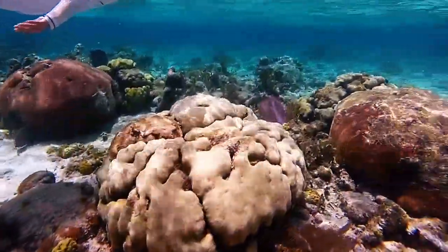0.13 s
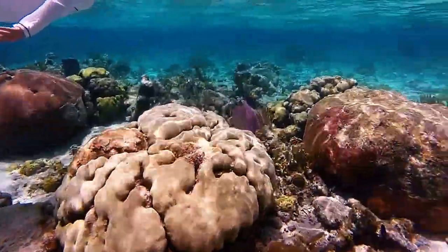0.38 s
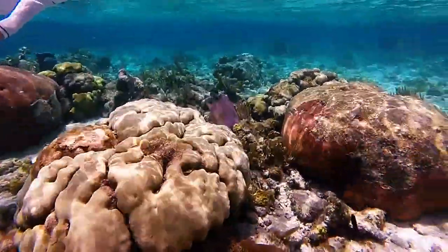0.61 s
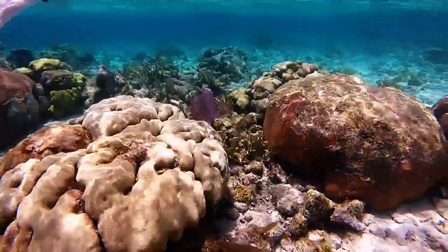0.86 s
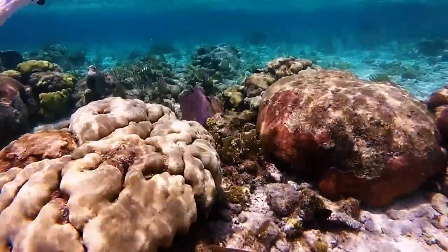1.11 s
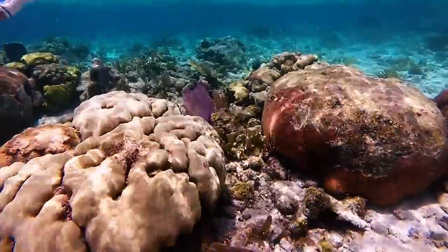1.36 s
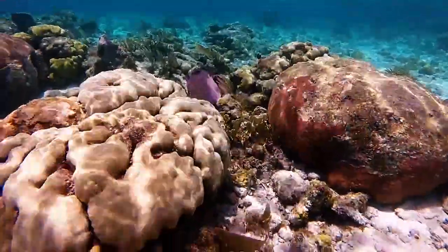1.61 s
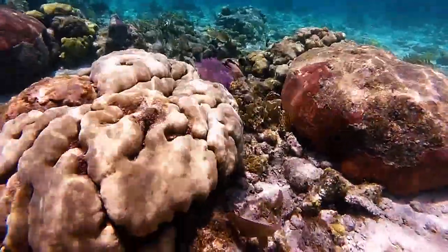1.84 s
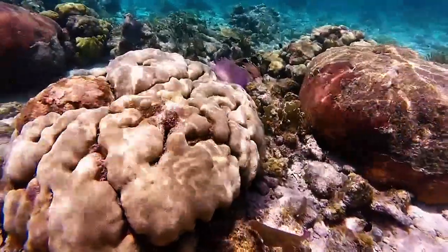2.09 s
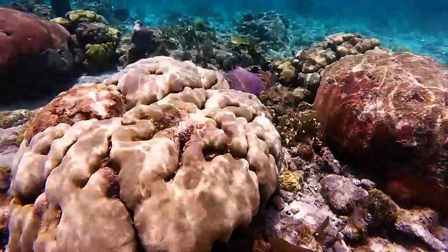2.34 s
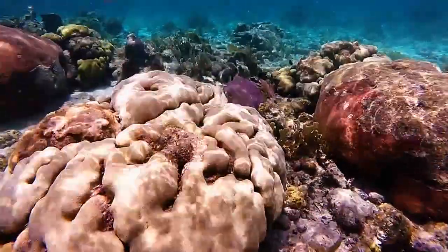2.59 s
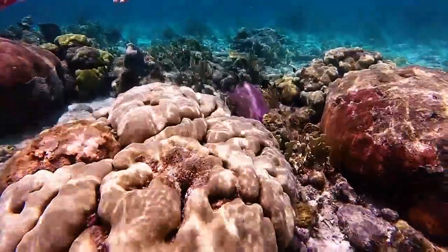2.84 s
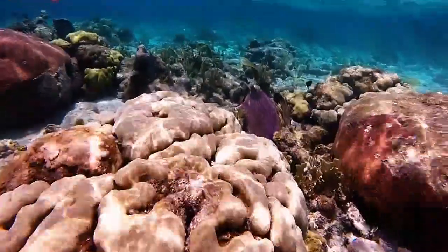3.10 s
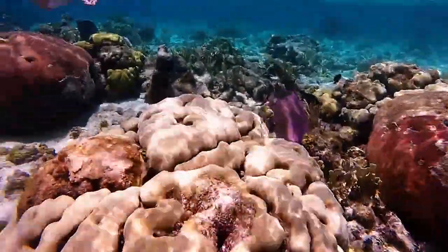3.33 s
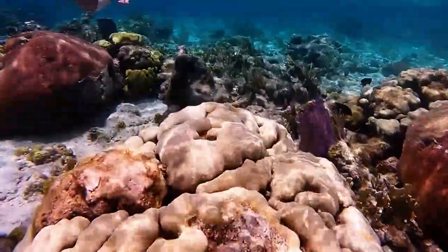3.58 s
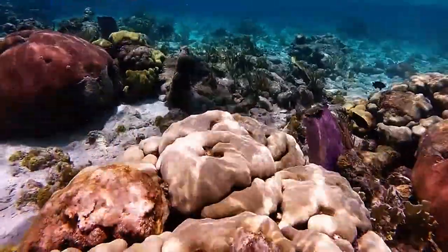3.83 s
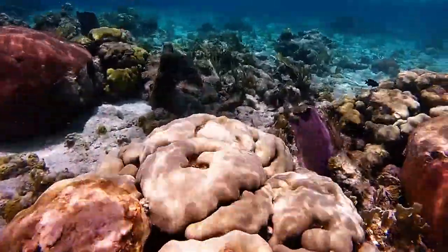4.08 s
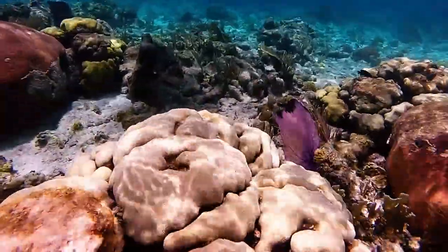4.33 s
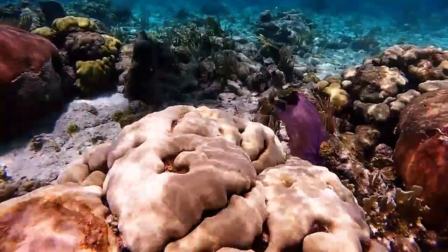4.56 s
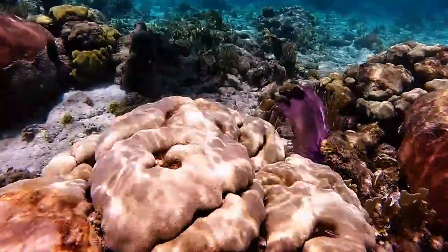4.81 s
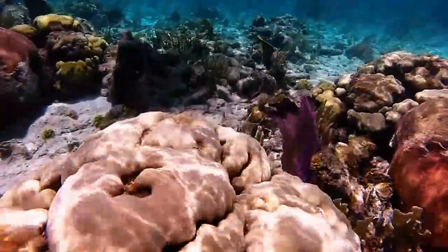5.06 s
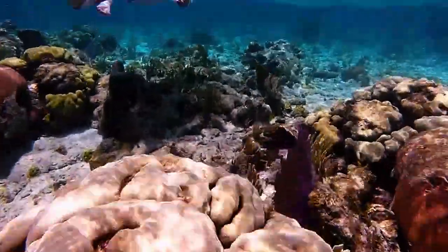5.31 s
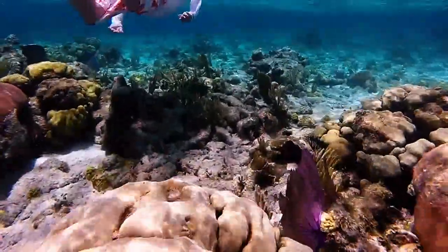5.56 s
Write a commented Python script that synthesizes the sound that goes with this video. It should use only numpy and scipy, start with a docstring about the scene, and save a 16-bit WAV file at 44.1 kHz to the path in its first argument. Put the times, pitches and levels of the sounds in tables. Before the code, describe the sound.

A mono, close and muffled underwater sound from inside a plastic camera housing gliding over a shallow reef. Low swell rumble, blurred gurgling and a soft even hiss lie beneath wavering bubble fizz and very faint, distant shrimp crackle. From the start, nearer shrimp make tiny treble snaps, bubbles break off in short bright puffs, and large ones glug with soft, slightly rising tones. Small bubbles soon plip like brief ringing drops. At 1.3 seconds a sharp, bright knock cracks against the housing; a duller clack follows at 1.8. A strong plip and puff pop at 2.35, another near 3.0. The heaviest knock lands at 3.3, with a deep thud and short ring, pushing everything down briefly before it recovers. Softer bumps come around 3.7, then a cluster of light taps at 4.4 to 4.55. Glugs gather between 3.8 and 4.9; a clear plip at 5.2 precedes thinning fizz until 5.7.

```python
"""Under water inside a plastic housing: a low rumble, gurgle and hiss lie under steady fizz and far shrimp crackle.
From the start near shrimp snap in the treble, bubbles break off in bright puffs and large ones glug as gliding tones;
soon small ones plip as brief ringing sines. From 1.3 s hard knocks set the housing's modes ringing, the heaviest
at 3.3 s. A limiter ducks the whole mix around any peak over its ceiling and lets it climb back."""
import sys
import numpy as np
from scipy import signal
from scipy.fft import rfft, irfft, next_fast_len
from scipy.io import wavfile
from scipy.ndimage import uniform_filter1d, minimum_filter1d, map_coordinates

SR = 44100
rng = np.random.default_rng(int(sys.argv[2]) if len(sys.argv) > 2 else 0)


def makeup_ratio(level_db):
    """Linear amplitude ratio for a level in decibels (20 dB per factor of ten)."""
    decades = np.asarray(level_db, float) / 20
    return 10 ** decades


def log_audio(samples):
    """Write samples as a 16-bit WAV file to the path given in sys.argv[1]."""
    # one column per channel
    frames = np.atleast_2d(samples).T
    # limit to full scale, then quantise
    limited = np.clip(frames, -1, 1)
    pcm = np.round(limited * 32767).astype(np.int16)
    wavfile.write(sys.argv[1], SR, pcm)


N = 250488  # length in samples


def unit(x):
    """Scales a sound to rms 1."""
    return x / np.sqrt(np.mean(x ** 2) + 1e-20)


def curve(rows, column):
    """One column of a time table, joined by straight lines, one value per sample."""
    table = np.transpose(rows)
    return np.interp(np.arange(N) / SR, table[0], table[column])


def coloured(x, points):
    """Equalizes x through (Hz, dB) points joined on a log frequency axis."""
    size = next_fast_len(len(x) + 8192)  # spare room keeps the end from wrapping onto the start
    hz, db = np.transpose(points)
    bin_hz = np.fft.rfftfreq(size, 1 / SR)
    gain = makeup_ratio(np.interp(np.log(bin_hz + 1), np.log(hz), db))
    return irfft(rfft(x, size) * gain, size)[:len(x)]


def wobble(rate):
    """A smooth random curve with rate knots a second."""
    knots = rng.standard_normal(int(N * rate / SR) + 4)
    return map_coordinates(knots, [np.arange(N) * rate / SR])


def place(start_s, shapes):
    """Sums the rows of shapes, each from its own start time."""
    start = np.round(np.asarray(start_s) * SR).astype(int)
    at = start[:, None] + np.arange(shapes.shape[1])
    return np.bincount(at.ravel(), shapes.ravel(), N + SR)[:N]


def peaked(db, shapes):
    """Scales each row so that its peak is db."""
    return makeup_ratio(db)[:, None] * shapes / np.abs(shapes).max(axis=1, keepdims=True)


def bubbles(db, hz, t60, attack, rise, size):
    """Damped sines, one a row, whose pitch climbs by the share 2 * rise in each t60."""
    t = np.arange(size) / SR
    db, hz, t60, attack = (np.reshape(v, (-1, 1)) for v in (db, hz, t60, attack))
    phase = 2 * np.pi * hz * t * (1 + rise * t / t60)
    swell = (1 - np.exp(-t / attack)) ** 2
    return makeup_ratio(db - 60 * t / t60) * swell * np.sin(phase)


def swarm(count, low_hz, high_hz, cycles, spread_db, attack, size):
    """Bubbles of random pitch, life and level at random moments, rms 1."""
    draw = rng.random((count, 4))
    hz = low_hz * (high_hz / low_hz) ** draw[:, 1]
    level_db = -spread_db * np.log(draw[:, 2] + .03)
    life = cycles * (0.49 + draw[:, 3]) / hz
    shapes = bubbles(level_db, hz, life, attack, rise=0.093, size=size)
    return unit(place(draw[:, 0] * N / SR, shapes))


def bursts(count, t60, attack, size, tail_db=-24.0):
    """Short dying puffs of noise, each with a weak longer tail scattered back by reef and surface."""
    t = np.arange(size) / SR
    decay = makeup_ratio(-60 * t / t60) + makeup_ratio(tail_db - 60 * t / 0.045)
    swell = 1 - np.exp(-t / attack)
    fade = np.linspace(1, 0, size)
    return rng.standard_normal((count, size)) * decay * swell * fade


def banded(noise, hz, skirt_db, floor_db, top_db):
    """Colours each row: a peak at its hz, skirt_db one octave off, a floor changing by top_db per octave above."""
    octaves = np.log2((np.fft.rfftfreq(noise.shape[1], 1 / SR) + 1) / hz[:, None])
    peak_db = skirt_db * octaves ** 2
    shelf_db = floor_db + top_db * np.maximum(octaves, 0)
    return irfft(rfft(noise) * makeup_ratio(np.maximum(peak_db, shelf_db)))


# Levels of the low water. Each row: time in seconds, rumble rms in dB, gurgle rms in dB.
WATER_LEVELS = [(0, -47, -51.5), (.45, -49.5, -51.5), (1, -53.5, -58.5), (1.4, -47, -53.5),
                (2.04, -54.5, -57.5), (2.34, -46.5, -52.5), (2.74, -54.5, -52.5), (3.1, -48, -54),
                (4, -51, -52), (4.65, -47.5, -48), (5.2, -49.5, -61), (5.68, -46, -59.5)]
# Colour of the swell's rumble. Each row: frequency in Hz, gain in dB.
RUMBLE_COLOUR = [(15, -6), (30, 4), (48, 0), (65, -5), (100, -3.5), (130, -53), (200, -54.5)]
# Colour of the far gurgle. Each row: frequency in Hz, gain in dB.
GURGLE_COLOUR = [(80, -54), (120, -15.5), (160, -2.5), (230, -1.5), (290, -5), (350, -8.5), (500, -47)]
# Colour of the sea and microphone hiss. Each row: frequency in Hz, gain in dB.
HISS_COLOUR = [(59, -29), (100, -2.5), (277, -14), (381, -10), (558, -12), (705, -13), (1390, -19),
               (2800, -21), (5650, -30), (11400, -39.5), (16000, -65.5)]


def water():
    """Swell rumbles against the housing, far large bubbles gurgle, sea and microphone hiss evenly."""
    rumble = unit(coloured(rng.standard_normal(N), RUMBLE_COLOUR) * makeup_ratio(1.6 * wobble(7.1)))
    far = swarm(count=260, low_hz=115, high_hz=313.0, cycles=12, spread_db=-1.5, attack=0.0021, size=7000)
    # noise blurs the single bubbles together
    gurgle = unit(coloured(far + makeup_ratio(17.5) * rng.standard_normal(N), GURGLE_COLOUR))
    hiss = unit(coloured(rng.standard_normal(N), HISS_COLOUR))
    low = makeup_ratio(curve(WATER_LEVELS, column=1)) * rumble + makeup_ratio(curve(WATER_LEVELS, column=2)) * gurgle
    return low + makeup_ratio(-55) * hiss


# Level of the fizz. Each row: time in seconds, level in dB.
FIZZ_LEVELS = [(0, -51), (1, -52.5), (1.3, -49.5), (1.37, -51), (1.6, -53.5), (1.9, -61.5), (2.3, -48.5),
               (2.8, -54.5), (3.05, -50), (3.35, -58), (3.9, -50), (4.6, -49.5), (5.05, -56.5), (5.68, -60)]
# How the housing wall passes the fizz. Each row: frequency in Hz, gain in dB.
WALL_COLOUR = [(500, -25), (800, -11.5), (890, -5), (1030, -13), (1250, -1), (1480, 1), (1790, 3.5),
               (1930, -9), (2200, -8.5), (2450, -1), (2700, -7.5), (2900, -9), (3300, -13), (3650, -23),
               (6000, -25), (15000, -39)]


def fizz(count=500):
    """Tiny bubbles ring and tick over a wavering noise bed of far ones, all heard through the wall."""
    near = swarm(count=2500, low_hz=824, high_hz=4320, cycles=22.2, spread_db=4.0, attack=0.00032, size=1200)
    near = near * makeup_ratio(1.3 * wobble(13.0))  # loose clumps
    bed = rng.standard_normal(N) * makeup_ratio(3.5 * wobble(30))
    draw = rng.random((count, 2))
    tick_gain = makeup_ratio(-3.6 * np.log(draw[:, 1:] + 0.018))  # many soft, few loud
    ticks = tick_gain * bursts(count=count, t60=0.028, attack=0.00098, size=700)
    ticks = coloured(place(draw[:, 0] * N / SR, ticks), [(800, 0.5), (1800, -10.0), (3500, 6), (6000, 5.0)])
    mix = unit(coloured(near, WALL_COLOUR)) + 0.57 * unit(coloured(bed, WALL_COLOUR))
    mix = mix + 0.48 * unit(coloured(ticks, WALL_COLOUR))
    return makeup_ratio(curve(FIZZ_LEVELS, column=1)) * unit(mix)


def crackle(count=420):
    """Far shrimp: many faint noise snaps at random moments."""
    draw = rng.random((count, 2))
    snap_gain = makeup_ratio(-4 * np.log(draw[:, 1:] + .01))
    faint = snap_gain * bursts(count=count, t60=.012, attack=.0003, size=700)
    colour = [(1500, -19), (4000, -12.0), (8000, -18.0), (11000, -16), (15000, -17.5)]
    return makeup_ratio(-72.5) * unit(coloured(place(draw[:, 0] * N / SR, faint), colour))


# Near shrimp. Each row: start in seconds, peak in dB, brightest frequency in Hz.
SNAP_EVENTS = [(0.018, -43, 6400), (0.0552, -38.5, 5100), (0.0698, -39.5, 4500), (0.292, -43, 6100),
               (0.7745, -41.5, 8060), (1.4158, -31.5, 4850), (1.7843, -35.5, 11000), (1.813, -33, 4860),
               (1.934, -32, 7950), (2.0949, -42.5, 6100), (2.2405, -36.5, 4630), (2.3508, -31.5, 5560),
               (2.391, -38.5, 5670), (2.48, -43.5, 4500), (2.5244, -31, 4960), (3.0211, -30.5, 4560),
               (3.3672, -39, 4690), (3.8512, -38, 5350), (3.9759, -39.5, 5970), (4.0193, -43, 7600),
               (4.216, -43, 7060), (4.4118, -27.5, 8500), (4.732, -39.5, 6800), (4.9795, -32.5, 6500),
               (5.02, -31.5, 4270), (5.1724, -34.5, 6260), (5.45, -42.5, 7440)]


def snaps():
    """A collapsing cavity: a puff of treble noise, brightest in a broad band of its own."""
    s, db, hz = np.transpose(SNAP_EVENTS)
    noise = bursts(count=len(s), t60=0.012, attack=0.00015, size=1024)
    return place(s, peaked(db, banded(noise, hz, skirt_db=-18, floor_db=-11, top_db=-2)))


# Bubbles breaking off. Each row: start in seconds, peak in dB, brightest frequency in Hz.
PUFF_EVENTS = [(0.018, -43, 2780), (0.458, -33, 2780), (0.551, -41.5, 2600), (0.565, -41, 3120),
               (0.634, -40.5, 2840), (0.707, -40.5, 3020), (1.111, -40.5, 3440), (1.283, -30.5, 2820),
               (1.415, -24, 1460), (2.24, -42, 2440), (2.35, -23, 2800), (2.486, -35, 2650),
               (2.524, -34, 2920), (2.931, -39, 2500), (2.953, -39, 2850), (3.02, -28, 2520),
               (3.077, -36, 2360), (4.171, -43, 2630), (4.413, -30, 2850), (4.776, -43.5, 2080),
               (4.977, -38.5, 2450), (5.02, -30.5, 2290), (5.166, -46, 2330), (5.173, -26, 2840),
               (5.327, -37.5, 2510)]


def puffs():
    """A bubble breaking off gives a short bright puff of noise in a narrow band."""
    s, db, hz = np.transpose(PUFF_EVENTS)
    noise = bursts(count=len(s), t60=0.017, attack=0.0018, size=1024)
    return place(s, peaked(db, banded(noise, hz, skirt_db=-90, floor_db=-25.5, top_db=-4.5)))


# Large bubbles. Each row: start in seconds, peak in dB, starting pitch in Hz, t60 in seconds.
GLUG_EVENTS = [(0.037, -42, 110, .1), (0.155, -43.5, 239, .086), (0.213, -40.5, 223, 0.26),
               (0.287, -41.5, 150, 0.18), (0.403, -40.5, 215, 0.24), (0.514, -31, 161, 0.13),
               (0.878, -38.5, 183, 0.27), (1.279, -27.5, 161, 0.14), (1.312, -32.5, 160, 0.1),
               (1.695, -39, 163, 0.09), (1.736, -46, 166, 0.15), (2.099, -28.5, 194, 0.071),
               (2.468, -42.5, 190, 0.21), (2.896, -40, 157, .078), (3.488, -31.5, 248, 0.097),
               (3.835, -40.5, 196, .17), (3.894, -34.5, 171, 0.12), (3.974, -38.5, 189, .15),
               (4.057, -37.5, 247, 0.071), (4.108, -42, 238, .09), (4.139, -40.5, 266, 0.056),
               (4.354, -38.5, 180.5, 0.11), (4.573, -36, 260, 0.082), (4.627, -29.5, 177, 0.027),
               (4.687, -34, 211, 0.13), (4.808, -33.5, 227, 0.052), (4.865, -35, 259.4, 0.13)]


def glugs():
    """Large bubbles start softly and rise a little in pitch as they ring out."""
    s, db, hz, t60 = np.transpose(GLUG_EVENTS)
    return place(s, peaked(db, bubbles(0, hz, t60, attack=0.0033, rise=.07, size=9000)))


# Small bubbles that ring. Each row: start in seconds, peak in dB, starting pitch in Hz.
PLIP_EVENTS = [(0.177, -40, 1510), (0.242, -35, 1280), (0.335, -41, 1490), (0.413, -40, 1410),
               (0.458, -34.5, 2990), (0.499, -37, 1640), (0.566, -42, 1540), (0.634, -41, 885),
               (0.775, -44, 833), (1.018, -42, 1800), (1.112, -32.5, 1430), (1.283, -26.5, 2910),
               (1.443, -36.5, 1760), (1.957, -38.5, 1346), (2.24, -29.5, 1390), (2.35, -17.5, 1590),
               (2.376, -37.5, 904), (2.474, -34, 1570), (2.486, -39, 2480), (2.93, -42, 1690),
               (3.019, -24.5, 1555), (3.179, -46, 1500), (3.366, -37, 2600), (3.547, -39, 2320),
               (3.846, -38, 1660), (3.977, -41, 1240), (3.992, -30, 1610), (4.15, -35, 1700),
               (4.171, -31.5, 1520), (4.639, -40.5, 1570), (4.722, -34.5, 1435), (4.776, -38.5, 1440),
               (5.019, -26.5, 1350), (5.023, -34.5, 917), (5.166, -37, 1490), (5.173, -18.5, 1630),
               (5.325, -40, 1490)]


def plips():
    """A small bubble swells and rings for a number of cycles; hard ones die sooner."""
    s, db, hz = np.transpose(PLIP_EVENTS)
    cycles = 38.7 * np.exp(-0.04 * (db + 35))  # 38.7 cycles to t60 at -35 dB, about 4 % fewer per dB above
    return place(s, peaked(db, bubbles(0, hz, cycles / hz, attack=0.00067, rise=0.033, size=2500)))


# Ringing modes of the housing. Each row: frequency in Hz, t60 in seconds, polarity as a signed factor,
# then relative level in dB when struck on the rim, back, corner and side.
HOUSING_MODES = [(49.4, 0.68, -0.53, -28, -34, -24.5, -32.5), (120.4, 0.043, -1.07, -11, -5, -7, -11.5),
                 (153, 0.12, -1.1, -16, -45, -19, -26.5), (205.4, 0.088, 0.78, -18, -10.5, -7, -19.5),
                 (354, 0.077, 0.92, -11, -13.5, -14.5, -15.5), (361, 0.51, 1, -38.5, -50, -43.5, -57),
                 (605, 0.048, -1.3, -27.5, -19.5, -29, -27.5), (700, .03, 0.92, -55, -21.5, -13.5, -56),
                 (914, 0.029, 0.49, -31, -4.5, -14, 1), (987, 0.016, 0.79, -50, -6.5, -17, -30),
                 (1280, 0.014, 0.49, -38.5, -6.5, -34, -3), (1490, 0.014, 0.73, 9, -15, 1.5, -5),
                 (1760, 0.017, 0.89, 0, -16.5, -6.5, 1), (1936, 0.017, 0.36, -29, -5.5, -16, -37),
                 (2480, 0.016, 0.75, -15.5, -11, -17.5, -13.5), (2510, .06, 1, -43.5, -39, -46, -50),
                 (2850, 0.017, -0.019, 22.5, 2, -28, -26), (3950, 0.011, 0.76, -18, -31.5, -10.5, -16)]
# Places a knock can land. Each entry: a name, in the order of the mode levels above.
SPOT_NAMES = ["rim", "back", "corner", "side"]
# Knocks. Each row: start in seconds, spot, contact time in seconds, drive in dB of the modes over 450 Hz (sharp),
# from 100 to 450 Hz (dull) and under 100 Hz (sway), crack gain in dB.
KNOCK_EVENTS = [(1.3337, "rim", 0.00016, 3.5, 3, 0, -1), (1.8347, "back", 0.00027, 4.5, -2, 6, -27),
                (3.344, "back", 0.00024, 9.5, 9.5, 17.5, -5), (3.6622, "back", 0.005, -29.5, -8, 6.5, -77),
                (3.729, "corner", 0.00024, -8, -6.5, 1, -61), (4.4423, "side", 0.00032, -3.5, -1, -2, -56),
                (4.5045, "side", 0.00034, -13, -7, -12, -58),
                (4.5424, "side", 0.00073, -21.5, -15, -22, -64)]
# Colour of the crack of sharp contact. Each row: frequency in Hz, gain in dB.
CRACK_COLOUR = [(1200, -35.5), (2000, 7), (2800, -3), (3600, 6), (4500, -2), (5500, -1.5), (7000, -9),
                (9500, -9.5), (16000, -36.5)]


def knocks():
    """Each blow rings the same modes; the spot it lands on sets how strongly each one answers."""
    t = np.arange(SR // 2) / SR
    hz, t60, polarity, *spot_db = np.transpose(HOUSING_MODES)
    cycles = hz[:, None] * t
    # every mode needs a part of a cycle to build up, so the low ones come late
    build_up = (1 - np.exp(-cycles / 0.11)) ** 2
    ring = makeup_ratio(-60 * t / t60[:, None]) * np.sin(2 * np.pi * cycles) * build_up
    s, spot, contact_s, sharp_db, dull_db, sway_db, crack_db = zip(*KNOCK_EVENTS)
    part = np.digitize(hz, [100, 450])  # 0 sway, 1 dull, 2 sharp
    blow_db = np.transpose([sway_db, dull_db, sharp_db])[:, part]
    answer_db = [spot_db[SPOT_NAMES.index(name)] for name in spot]
    strength = polarity * makeup_ratio(blow_db + answer_db)
    # a longer contact is a smoother push and leaves the high modes still
    push = np.sin(np.pi * np.minimum(t[:400] / np.array(contact_s)[:, None], 1)) ** 2
    push = push / push.sum(axis=1, keepdims=True)
    blows = signal.fftconvolve(strength @ ring, push, axes=1)
    noise = bursts(count=len(s), t60=0.0045, attack=0.00024, size=1024, tail_db=-41.5)
    cracks = makeup_ratio(np.array(crack_db))[:, None] * noise
    return place(s, blows) + coloured(place(s, cracks), CRACK_COLOUR)


def scene():
    """All layers summed into one channel."""
    steady = water() + fizz() + crackle()
    return (steady + snaps() + puffs() + glugs() + plips() + knocks())[None]


# Tone of the microphone. Each row: frequency in Hz, gain in dB.
MICROPHONE_COLOUR = [(20, -2.5), (14000, -1.5), (15500, -13.5), (16500, -19.5)]


def microphone(dry):
    """The microphone rolls off the extreme treble."""
    return coloured(dry[0], MICROPHONE_COLOUR)[None]


def limiter(x, top_db, hold_s, release_db):
    """The gain drops just ahead of a peak over the top, holds, then climbs back at release_db a second."""
    needed_db = np.minimum(top_db - 20 * np.log10(np.abs(x) + 1e-9), 0)
    ahead, hold = SR // 500, int(hold_s * SR)  # samples; looks 2 ms ahead
    held_db = minimum_filter1d(needed_db, hold, origin=(hold - 1) // 2 - ahead)
    climb_db = release_db * np.arange(N) / SR
    gain_db = np.minimum.accumulate(held_db - climb_db, axis=-1) + climb_db
    return x * makeup_ratio(uniform_filter1d(np.minimum(gain_db, 0), ahead))


def band_limit(x):
    """A steep low-pass at the top of the band."""
    return signal.sosfilt(signal.butter(12, 16340, fs=SR, output="sos"), x)


def record(dry):
    """Microphone tone, limiter, then a clip at full scale."""
    limited = limiter(microphone(dry), top_db=0.2, hold_s=0.13, release_db=20.0)
    mix = np.clip(limited, -1, 1)
    return band_limit(mix)


dry = scene()
out = record(dry)
log_audio(out)
```